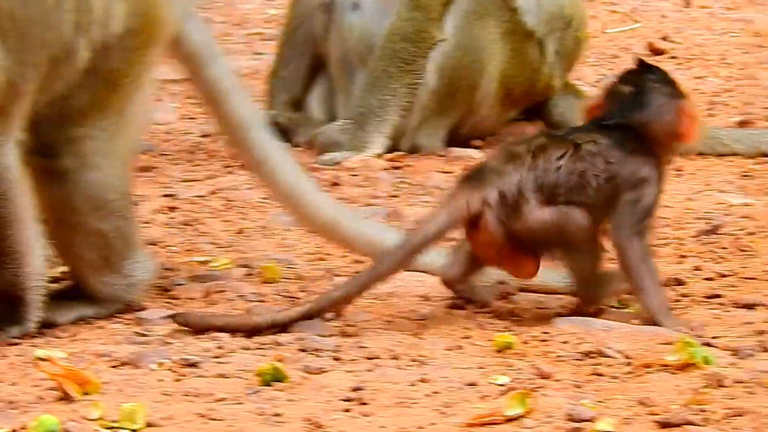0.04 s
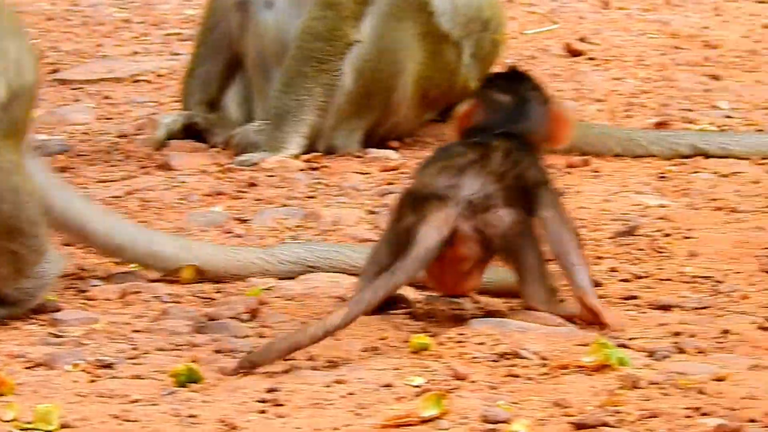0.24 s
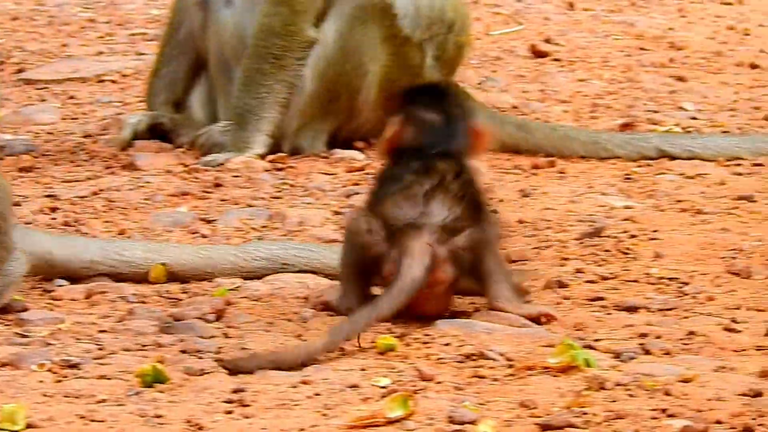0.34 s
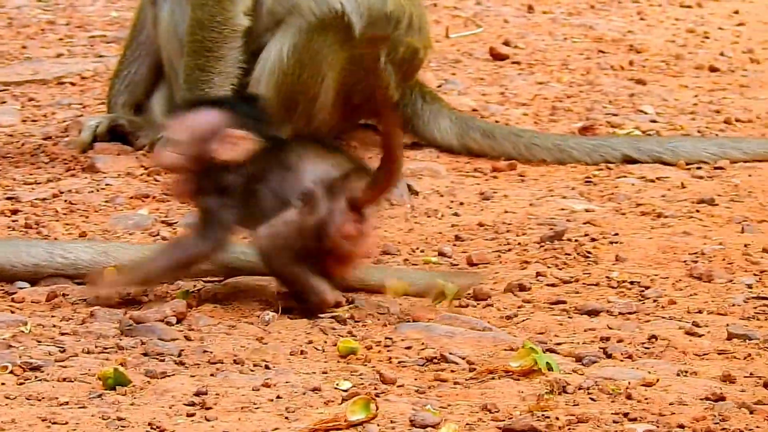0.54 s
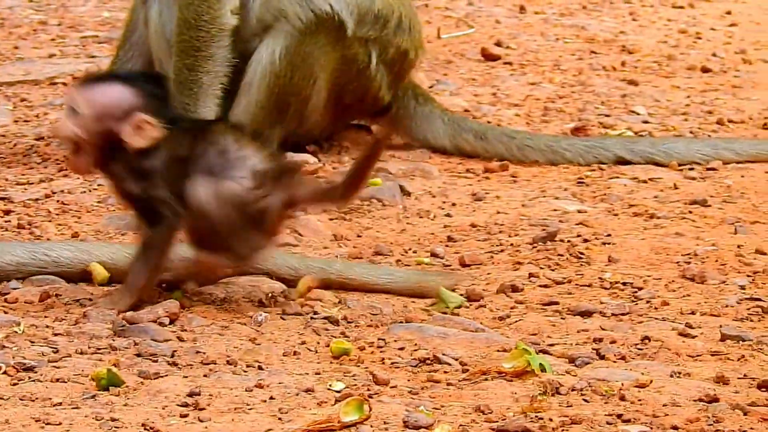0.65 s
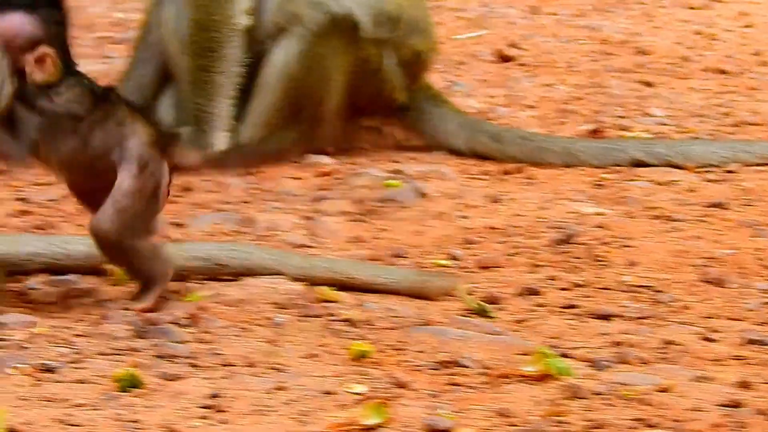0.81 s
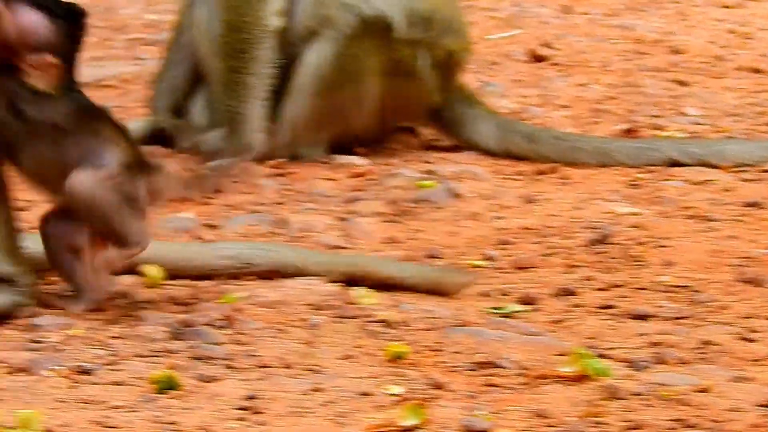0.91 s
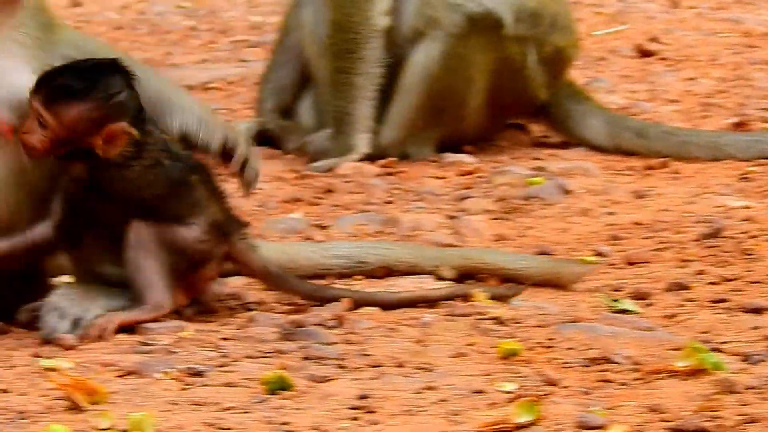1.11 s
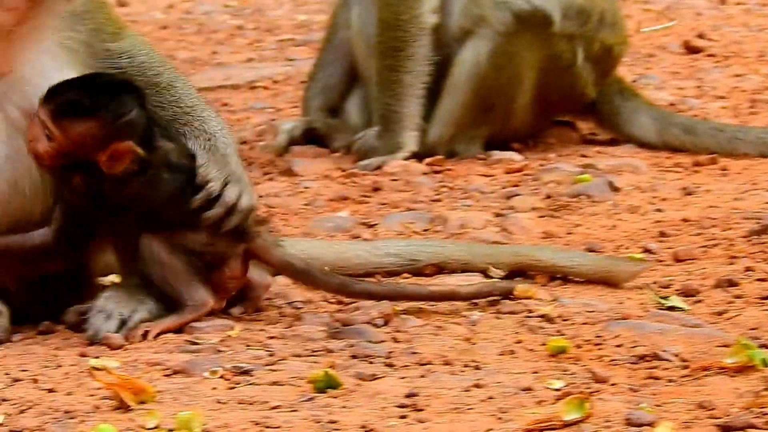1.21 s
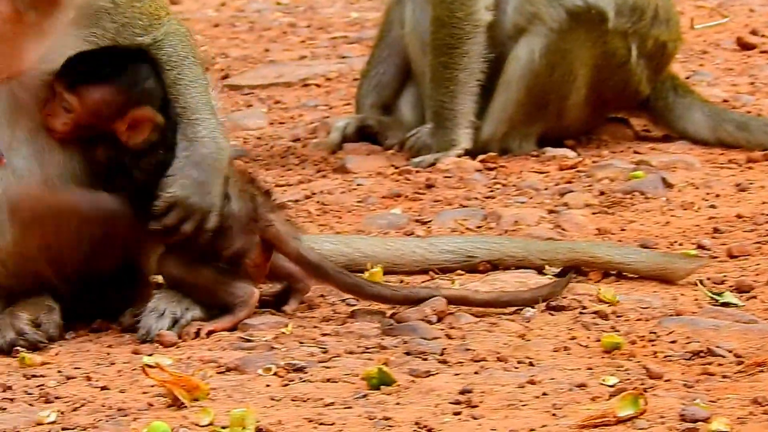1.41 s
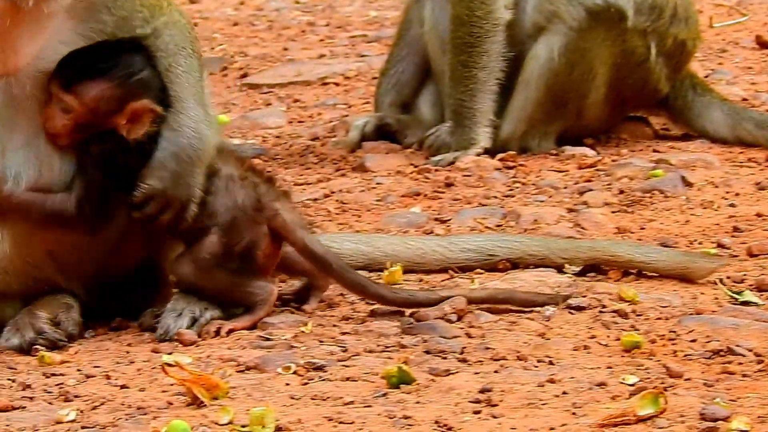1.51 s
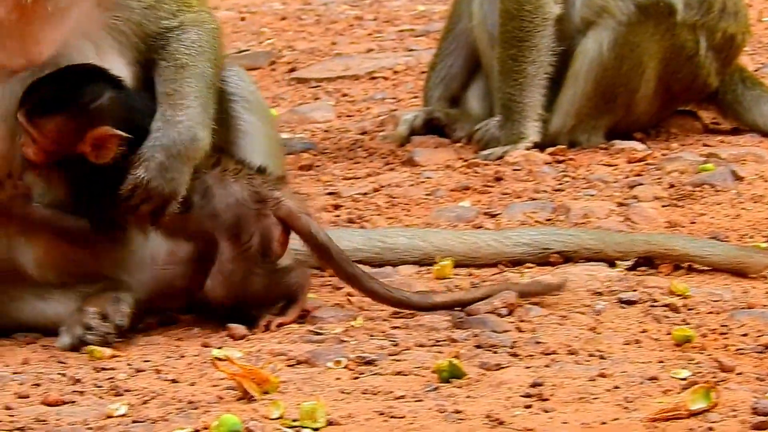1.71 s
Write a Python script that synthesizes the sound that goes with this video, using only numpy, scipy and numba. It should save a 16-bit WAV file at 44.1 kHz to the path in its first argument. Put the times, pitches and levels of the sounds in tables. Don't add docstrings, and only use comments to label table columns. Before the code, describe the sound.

Monkey squeal outdoors: the fading echo of an earlier call, one rough adult bark slightly further off, then a very high ragged shriek up close, a woodland echo tail and small steps on gritty ground.

```python
import sys
import numpy as np
from scipy import signal
from scipy.io import wavfile
from scipy.ndimage import uniform_filter1d
from numba import njit

SR = 44100
rng = np.random.default_rng(int(sys.argv[2]) if len(sys.argv) > 2 else 0)


def attenuation_scalar(level_db):
    decades = np.asarray(level_db, float) / 20
    return 10 ** decades


def master_out(mix):
    frames = np.transpose(np.atleast_2d(mix))
    ceiling = np.clip(frames, -1, 1)
    pcm = np.round(ceiling * 32767).astype(np.int16)
    wavfile.write(sys.argv[1], SR, pcm)


N = 77175

# hz, level_db_per_hz
AIR_SPECTRUM = [(30, -13), (100, -4), (250, -5.5), (500, -17), (2400, -27.5), (6400, -15), (9000, -39.5),
                (15000, -47)]
AIR_DB = -73

# hz, width_hz, level_db
EARLIER_PEAKS = [(322, 300, -27.5), (610, 120, -35.5), (960, 250, -4), (1260, 180, -6.5), (1880, 1400, -12),
                 (3440, 770, -11.5), (4670, 1600, -25), (7230, 760, -38.5)]
EARLIER_DB, EARLIER_T60_S = -31.5, 1

# hz, width_hz, level_db
EXHAUST_PIPE = [(105, 45, -7), (175, 46, 0), (345, 55, -8), (470, 70, -19)]
ENGINE_HZ, ENGINE_LATE_S = 21.8, 0.026
ENGINE_DB, ENGINE_FADE_DB_S = -71, -15

# start_s, tick_db, hiss_db, hiss_t60_s, low_share_db, swell_s
SCUFFS = [
    (0.07, -52, -87, 0.019, -40, 0.015),
    (0.108, -54, -57.5, 0.45, -18, 0.0073),
    (1.095, -49, -51, 0.36, -24, 0.02),
    (1.195, -81, -86, 0.45, 7, .011),
    (1.255, -73, -64, .7, -4.5, .015),
    (1.33, -90, -71, .6, -0.5, .04),
    (1.42, -90, -72.5, 0.49, -26, 0.018),
    (1.548, -75, -67.5, 0.41, -42, .012),
    (1.617, -72, -90, 0.085, 4.5, .011),
    (1.627, -50, -61, 4.4, -22, .009),
]
TICK_S = 0.0013

# time_s, second_harmonic_hz, hoarse_db
BARK_FOLDS = [(0.224, 1054, -25), (0.237, 1058, -13), (0.25, 1135, -17), (0.311, 1019, -17.5),
              (0.398, 1085, -18.5), (0.412, 1170, -16), (0.428, 989.5, -14), (0.475, 989, -23),
              (0.5, 1119, -19.5)]
BARK_PERIOD_SCATTER, BARK_SIZE_SCATTER_DB = 0.08, 1.8
# hz, width_hz, level_db
THROAT = [(305, 260, -25.5), (578.2, 56, -22), (842.4, 220, -4.5), (1151.5, 350, 2.5), (1622, 830, -13),
          (2270, 830, -12), (3110, 2700, -18.5)]
INTAKE_START_S, INTAKE_DB = 0.178, -25.5
INTAKE_HZ, INTAKE_WIDTH_HZ = 1100, 705
# start_s, end_s, from_hz, to_hz, level_db
CLEAR_MOMENTS = [(.197, .226, 765, 790, -20), (.228, .262, 1030, 1135, -18),
                 (.336, .358, 1050, 1020, -15.5), (.355, .372, 1110, 1120, -18),
                 (.373, .403, 1050, 1075, -15.5), (.416, .441, 1010, 975, -16), (.226, .37, 545, 565, -43),
                 (.36, .44, 570, 610, -42), (.24, .4, 2190, 2160, -40), (.222, .275, 2410, 2370, -41),
                 (.31, .36, 1560, 1610, -33), (.266, .31, 1440, 1570, -31), (.405, .445, 1540, 1600, -30),
                 (.262, .3, 900, 860, -27)]
# multiple, level_db
OVERTONES = [(1.47, -21), (2.02, -29.5)]

# hz, width_hz, level_db
RASP_PEAKS = [(4780, 540, 2.5), (5680, 680, -11), (6770, 1300, 1.5), (9393, 1800, -19), (12130, 5000, -43)]
# time_s, level_db
RASP_LEVEL = [(0.207, -62), (.222, -62), (.232, -36), (.25, -39), (.266, -30.5), (.3, -35.5), (.345, -36),
              (.36, -43.5), (.378, -36), (0.398, -42), (.446, -41.5), (.5, -50)]
RASP_SAG_PER_S, RASP_BRIGHTENS_DB_S = 0.66, 27.5

# low_hz, high_hz, t60_s, level_db
TREES = [(100, 670, 0.49, -5), (753.5, 1302, 0.6, -2), (1293, 2650, 1, 0.5), (3000, 4200, .8, 1.5),
         (4214, 5400, 0.35, 7), (5450, 7600, .45, 4), (7600, 9500, 0.43, 2.5), (9500, 22000, .15, -2.5)]
ECHO_GAP_S = 0.008
ECHO_BEND_DB_S2 = -59.5
BARK_WET_DB, SQUEAL_WET_DB, LEAF_SMEAR_HZ = -6, -10.5, 1500

# time_s, breath_db, partial_db
RISE = [(0.528, -55.5, -51.5), (0.533, -50, -34), (0.541, -49.5, -36), (0.55, -46.5, -31),
        (0.56, -49.5, -29.5), (0.57, -46, -28), (0.576, -45.5, -40), (0.584, -44.5, -33.5),
        (0.602, -45, -28), (0.61, -51, -37)]
# time_s, pitch_hz
RISE_HZ = [(.527, 7900), (.533, 8400), (.544, 9950), (.55, 9560), (.568, 9700), (.577, 10150), (.59, 10100),
           (.61, 10350)]
# time_s, breath_db, partial_db, half_partial_db
FALL = [(0.756, -41.5, -45, -66), (0.776, -38, -32, -38), (0.797, -38, -33.5, -44),
        (.812, -35.5, -38.5, -53), (0.821, -53, -34, -33.5), (0.833, -50.5, -30.5, -32.5),
        (.837, -54, -44.5, -42), (0.841, -52, -32.5, -35), (0.857, -46, -30, -33),
        (0.863, -42.5, -35, -34.5), (0.88, -42.5, -37, -36.5), (.887, -40.5, -25.5, -32),
        (.897, -28.5, -30.5, -36), (0.902, -38.5, -27.5, -27), (.912, -36.5, -26, -62.5),
        (0.921, -37, -30.5, -69), (0.934, -55.5, -30, -81)]
# time_s, pitch_hz
FALL_HZ = [(.757, 10450), (.78, 10450), (.8, 10520), (.82, 10470), (.832, 10250), (.854, 9816), (.88, 9312),
           (.894, 8980), (.906, 8720), (.915, 8150), (.93, 7050)]
WAVER, FLUTTER_DB = 0.005, 2.2
THIRD_START_S, THIRD_END_S, THIRD_DB = 0.889, 0.921, -43
RIDER_ABOVE_HZ, RIDER_DB = 3850, -28.5

# time_s, level_db, mouth_hz, upper_hz, throat_share_db
SCREAM = [(.583, -50.5, 6900, 11100, -25.5), (.597, -35.5, 7100, 10300, -25),
          (.61, -32.5, 7400, 10500, -15.5), (.63, -30, 7960, 11470, -7), (0.651, -29, 8080, 11170, -9),
          (0.659, -33.5, 6935, 11060, -7), (.674, -33, 6770, 9830, -7.5), (0.689, -29.5, 7066, 9685, -5.5),
          (.702, -29, 6820, 9940, -6.5), (0.713, -37.5, 7610, 10780, -6.5),
          (.726, -26.5, 7500, 10640, -6.5), (.74, -28.5, 7700, 10860, -4), (.753, -29.5, 7700, 10370, -5.5),
          (.758, -41, 7600, 10460, -15.5)]
SCREAM_HZ, SCREAM_PERIOD_SCATTER, SCREAM_SIZE_SCATTER_DB = 3400, 0.4, 2.0
SCREAM_THROAT_HZ = 5150

BIRD_START_S, BIRD_HZ, BIRD_DB = 1.706, 1240, -75.5

WIDE_HZ, WIDE_DB, BASS_WIDE_DB = 6000, -1.5, -33
SQUEAL_LEAD_S = 1.3e-5
GROUND_SIDE_DB = -8.5
LOPSIDED = 0.028


def level(x, db):
    return x * attenuation_scalar(db) / np.sqrt(np.mean(x ** 2))


@njit
def svf(x, hz, width):
    y, b, l = np.empty(len(x)), 0., 0.
    for i in range(len(x)):
        g, k = np.tan(np.pi * hz[i] / SR), width / hz[i]
        v = (b + g * (x[i] - l)) / (1 + g * (g + k))
        b, l, y[i] = 2 * v - b, l + 2 * g * v, k * v
    return y


@njit
def fire(hz, stretch, size):
    out, p, k = np.zeros(len(hz) + 1), 0., 0
    for i in range(len(hz)):
        step = hz[i] * stretch[k] / SR
        p += step
        if p >= 1:
            p, k = p - 1, k + 1
            out[i] += size[k] * p / step
            out[i + 1] += size[k] * (1 - p / step)
    return out[:-1]


def pulses(hz, scatter, scatter_db):
    period, size = rng.standard_normal((N // 4, 2)).T
    return fire(hz + np.zeros(N), np.clip(1 + scatter * period, 0.3, 3), attenuation_scalar(scatter_db * size))


def band(x, hz, width):
    hz = np.clip(hz + np.zeros(N), 20, 0.45 * SR)
    return svf(svf(x, hz, 1. * width), hz, 1. * width)


def body(x, peaks):
    out = 0
    for k, (hz, width, db) in enumerate(peaks):
        out = out + (-1) ** k * level(band(x, hz, width), db)
    return level(out, 0)


def walk(rate):
    k = int(SR / rate)
    steps = np.repeat(rng.standard_normal(N // k + 1), k)
    return 1.1 * uniform_filter1d(uniform_filter1d(steps, k), k)[:N]


def col(t, rows, order):
    rows = np.array(rows)
    return np.interp(t, rows[:, 0], rows[:, order])


def gate(t, start, end, edge):
    return np.clip((t - start) / edge, 0, 1) * np.clip((end - t) / edge, 0, 1)


def sine(hz):
    return 2 * np.pi * np.cumsum(hz) / SR


def spread(mid, side):
    treble = signal.lfilter(*signal.butter(1, WIDE_HZ, "high", fs=SR), side)
    side = attenuation_scalar(WIDE_DB) * treble + attenuation_scalar(BASS_WIDE_DB) * side
    return np.array([mid + side, mid - side])


def diffuse(shape):
    return spread(shape(rng.standard_normal(N)), shape(rng.standard_normal(N)))


def air():
    spectrum_hz, spectrum_db = np.array(AIR_SPECTRUM).T
    out = 0
    for hz in 40 * 2 ** np.arange(0, 8.6, 0.5):
        db = np.interp(np.log(hz), np.log(spectrum_hz), spectrum_db) + 0.4 * walk(3.4)
        out = out + attenuation_scalar(db) * diffuse(lambda n: band(n, hz, hz / 2))
    return level(out, AIR_DB)


def earlier_echo(t):
    decay = attenuation_scalar(EARLIER_DB - 1.5 - 60 * t / EARLIER_T60_S) + attenuation_scalar(-38.5 - 60 * t / 0.31)
    return diffuse(lambda n: body(n, EARLIER_PEAKS) * decay)


def engine(t):
    firing = np.roll(pulses(ENGINE_HZ, 0.004, 1.8), int(ENGINE_LATE_S * SR))
    return body(firing, EXHAUST_PIPE) * attenuation_scalar(ENGINE_DB + ENGINE_FADE_DB_S * np.maximum(t - 1.3, 0))


def scuffs(t):
    high, low = 0, 0
    for start, tick_db, hiss_db, t60, low_db, swell in SCUFFS:
        age = np.maximum(t - start, 0)
        tick = attenuation_scalar(tick_db) * (age / TICK_S) ** 2 * np.exp(2 - 2 * age / TICK_S)
        hiss = attenuation_scalar(hiss_db - 60 * age / t60) * np.clip(age / swell, 0, 1) ** 2
        high = high + tick + hiss
        low = low + (tick + hiss) * attenuation_scalar(low_db)
    grit = attenuation_scalar(2.0 * walk(310))
    peaks = [(5300, 900, -6.5), (6410, 1300, 2.5), (7700, 1200, -16)]
    return diffuse(lambda n: high * body(n * grit, peaks) + low * level(band(n * grit, 3400, 1800), 0))


def bark(t):
    start, end = BARK_FOLDS[0][0], BARK_FOLDS[-1][0]
    folds = pulses(col(t, BARK_FOLDS, order=1) / 2, BARK_PERIOD_SCATTER, BARK_SIZE_SCATTER_DB)
    effort = attenuation_scalar(col(t, BARK_FOLDS, order=2) - 4.0) * gate(t, start, end, 0.0083)
    intake = level(band(folds, INTAKE_HZ, INTAKE_WIDTH_HZ), INTAKE_DB - 1.35)
    intake = intake * gate(t, INTAKE_START_S, start + 0.02, 0.025)
    return body(folds, THROAT) * effort + intake + rasp(t, folds) + clear_voice(t)


def rasp(t, folds):
    noise = uniform_filter1d(folds, size=70) * rng.standard_normal(N)
    sag = 1 - RASP_SAG_PER_S * np.clip(t - RASP_LEVEL[2][0], 0, 0.25)
    x = 0
    for k, (hz, width, db) in enumerate(RASP_PEAKS):
        brighten_db = (k > 2) * RASP_BRIGHTENS_DB_S * (t - 3.5)
        x = x + (-1) ** k * level(band(noise, hz * sag, width), db) * attenuation_scalar(2.2 * walk(45) + brighten_db)
    on = gate(t, RASP_LEVEL[0][0], RASP_LEVEL[-1][0], 0.008)
    return level(x, 0) * attenuation_scalar(col(t, RASP_LEVEL, order=1)) * on


def clear_voice(t):
    out = 0
    for start, end, from_hz, to_hz, db in CLEAR_MOMENTS:
        phase = sine(np.interp(t, [start, end], [from_hz, to_hz]) * (1 + 0.012 * walk(149.5)))
        tone = np.sin(phase)
        for multiple, overtone_db in OVERTONES:
            tone = tone + attenuation_scalar(overtone_db + 4.4 * walk(150)) * np.sin(multiple * phase)
        on = gate(t, start - 0.004, end + 0.0035, 0.011)
        out = out + attenuation_scalar(db + 1.4 * walk(100)) * np.sqrt(2) * on * tone
    return out


def trees(x):
    t = np.arange(SR) / SR
    echoes = []
    for noise in rng.standard_normal((2, SR)):
        tail = 0
        for low, high, t60, db in TREES:
            sos = signal.butter(3, [low, high], "band", fs=SR, output="sos")
            tail = tail + signal.sosfilt(sos, noise) * attenuation_scalar(db - 60 * t / t60 + ECHO_BEND_DB_S2 * t ** 2)
        tail = tail * np.clip(t / ECHO_GAP_S, 0, 1)
        echoes.append(signal.fftconvolve(x, tail / np.sqrt(np.sum(tail ** 2)))[:N])
    return spread(*echoes)


def muffle(x):
    return level(signal.sosfilt(signal.butter(4, [4300, 11500], "band", fs=SR, output="sos"), x), 0)


def whistle(t, pitch, rows, multiples):
    hz = col(t, pitch, order=1) * (1 + WAVER * walk(300))
    phase = sine(hz)
    tone = 0
    for k, multiple in enumerate(multiples):
        flutter_db = (FLUTTER_DB + 2.3 * k) * walk(170 + 250 * k)
        tone = tone + attenuation_scalar(col(t, rows, order=2 + k) + flutter_db) * np.sin(multiple * phase)
    third_on = gate(t, THIRD_START_S, THIRD_END_S, 0.008)
    tone = tone + attenuation_scalar(THIRD_DB + 2.5 * walk(200)) * third_on * np.sin(1.5 * phase)
    noise = rng.standard_normal(N)
    breath = muffle(band(noise, hz * 0.7, 5800)) * attenuation_scalar(col(t, rows, order=1) + 1.9 * walk(120))
    rider = level(band(noise, hz + RIDER_ABOVE_HZ, 500), RIDER_DB + np.median(np.array(rows)[:, 2]))
    return (tone * np.sqrt(2) + breath + rider) * gate(t, rows[0][0], rows[-1][0], 0.004)


def scream(t):
    folds = pulses(SCREAM_HZ, SCREAM_PERIOD_SCATTER, SCREAM_SIZE_SCATTER_DB)

    def ring(hz, width, db):
        return level(band(folds, hz, width), db) * attenuation_scalar(1.8 * walk(180))

    upper_hz = col(t, SCREAM, order=3)
    mouth = ring(col(t, SCREAM, order=2), 2200, 0)
    upper = ring(upper_hz, 1700, -7) + ring(upper_hz, 450, -14.5)
    throat = ring(SCREAM_THROAT_HZ, 1700, 0) * attenuation_scalar(col(t, SCREAM, order=4))
    x = muffle(mouth - upper - throat) + ring(15500, 4000, -28.0) + ring(14300, 900, -29)
    return x * attenuation_scalar(col(t, SCREAM, order=1)) * gate(t, SCREAM[0][0], SCREAM[-1][0], 0.0045)


def far_bird(t):
    on = gate(t, BIRD_START_S, 9, 0.02)
    return attenuation_scalar(BIRD_DB + 4.1 * walk(41)) * on * np.sin(2 * np.pi * BIRD_HZ * t)


def scene():
    t = np.arange(N) / SR
    adult = bark(t)
    young = whistle(t, RISE_HZ, RISE, [1]) + whistle(t, FALL_HZ, FALL, [1, 0.5]) + scream(t)
    treble = signal.butter(4, 3600, "high", fs=SR, output="sos")
    leaf_smeared = signal.sosfilt(treble, young * walk(LEAF_SMEAR_HZ))
    echo = trees(attenuation_scalar(BARK_WET_DB) * adult + attenuation_scalar(SQUEAL_WET_DB) * leaf_smeared)
    young_side = np.gradient(young) * SQUEAL_LEAD_S * SR / 2 + attenuation_scalar(GROUND_SIDE_DB) * young * walk(500)
    calls = attenuation_scalar(-1.5) * adult + young + young_side * np.array([[1], [-1]]) + echo
    return calls + earlier_echo(t) + engine(t) + far_bird(t) + air() + scuffs(t)


def low_pass(x):
    return signal.sosfilt(signal.butter(12, 15700, fs=SR, output="sos"), x)


def record(dry):
    bent = dry + LOPSIDED * signal.lfilter(*signal.butter(1, 15, "high", fs=SR), dry ** 2)
    return low_pass(bent)


dry = scene()
out = record(dry)
master_out(out)
```